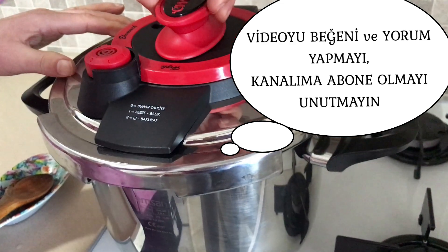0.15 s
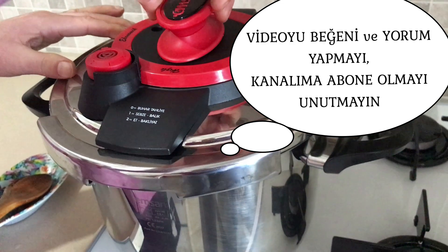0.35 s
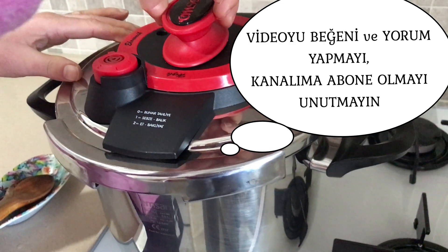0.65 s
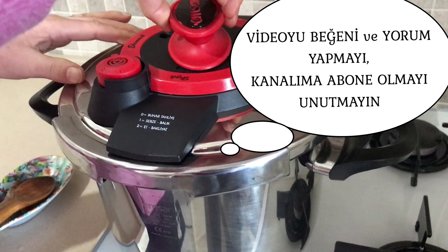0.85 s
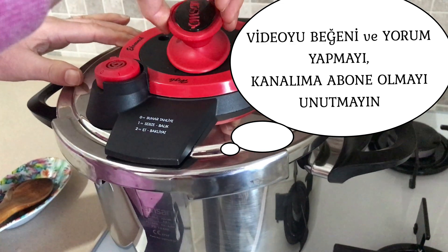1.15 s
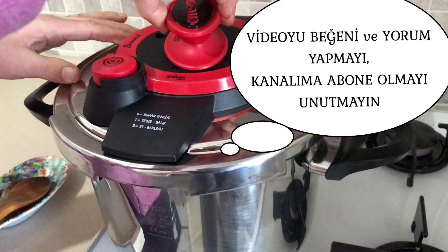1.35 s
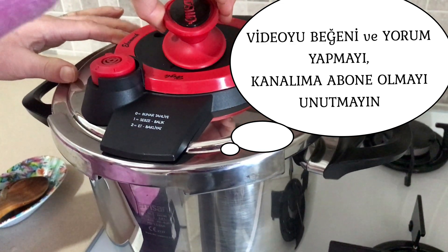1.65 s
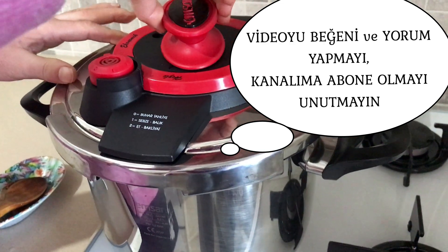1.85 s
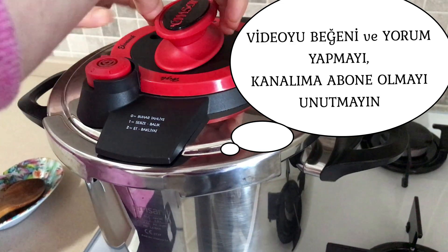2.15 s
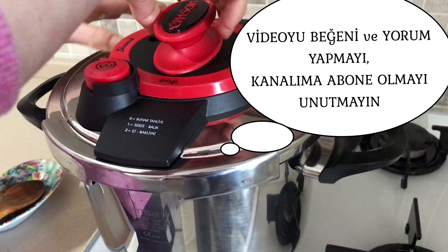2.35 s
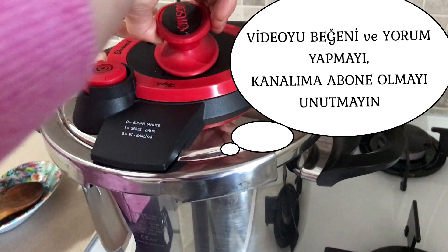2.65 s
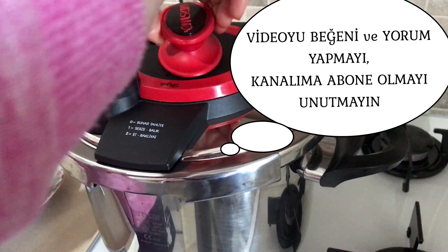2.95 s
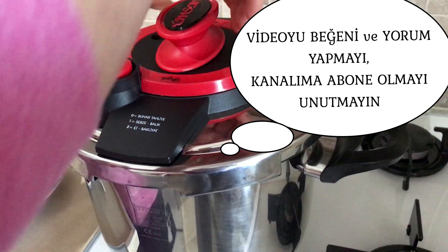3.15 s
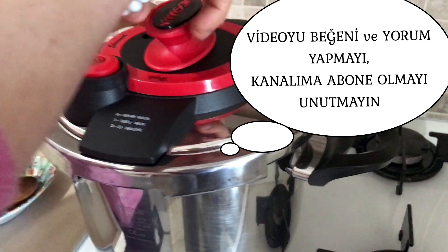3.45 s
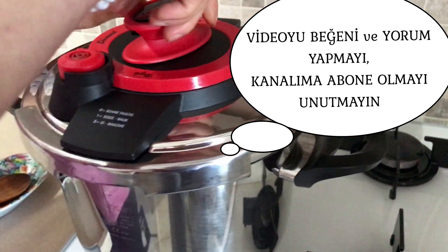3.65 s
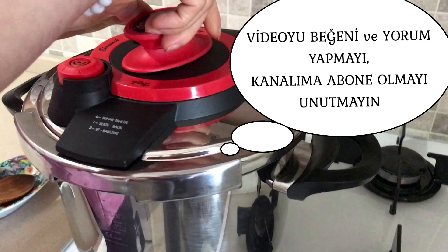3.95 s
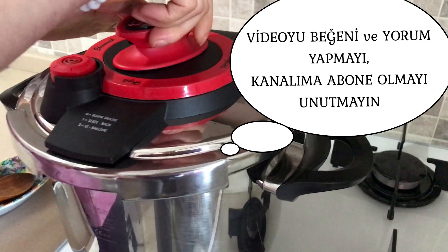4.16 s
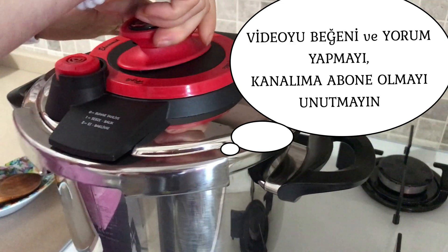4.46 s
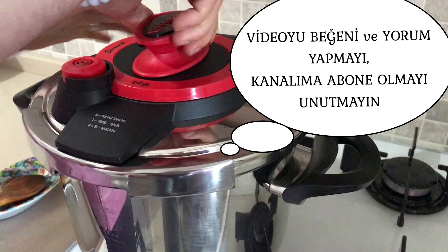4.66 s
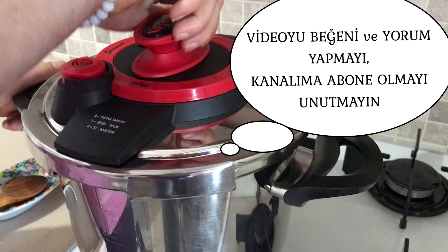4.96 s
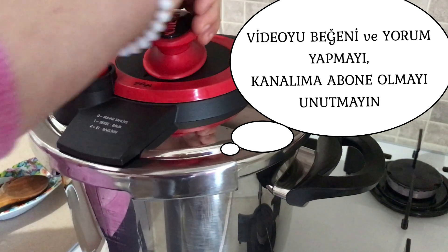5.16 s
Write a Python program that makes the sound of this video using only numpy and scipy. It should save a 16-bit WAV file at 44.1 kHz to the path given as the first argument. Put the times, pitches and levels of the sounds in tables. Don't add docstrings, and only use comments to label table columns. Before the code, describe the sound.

A plastic knob is worked on a steel pressure cooker lid, close to a camera microphone in a hard-walled kitchen. Faint taps begin around 0.1 s, with a clearer plastic clatter and tick at 0.34-0.44 s. At about 0.88 s the clamps snap home: several very fast, hard cracks, by far the loudest event, with bright steel ring, hollow pot boom and short echo. Firm smaller clicks follow at 1.16-1.27 s, then faint ticks. Around 2.0-2.1 s there are light clicks and a short rub; a sharper clack lands at 2.6 s. Soft rubbing and touches come near 3.1 s, a sudden scrape with ticks at 3.6-3.7 s, and low dull pot rocking to about 4.3 s. Clicks cluster at 4.56-4.63 s, and a crisp double knock with a soft rub closes near 5.2 s. Faint steady hiss with slight resonant colour and low rumble persist, briefly thinning at moments.

```python
import sys
import numpy as np
from scipy import signal
from scipy.fft import rfft, irfft, next_fast_len
from scipy.io import wavfile
from scipy.ndimage import map_coordinates

SR = 44100
rng = np.random.default_rng(int(sys.argv[2]) if len(sys.argv) > 2 else 0)


def master(y):
    cut = np.clip(np.atleast_2d(y).T, -1, 1)
    pcm = np.round(cut * 32767)
    wavfile.write(sys.argv[1], SR, pcm.astype(np.int16))


def field_ratio(decibels):
    return 10 ** (np.asarray(decibels, dtype=float) / 20)


N = 233834

# (time [s], peak level [dB], plastic pitch [Hz], rattle [ms])
KNOCKS = [(0.113, -53.5, 2300, 16), (.158, -41, 1280, 13), (0.337, -29.5, 1870, 23),
          (1.269, -31, 2090, 8.8), (2.0555, -40.5, 2230, 18), (2.072, -42, 2250, 8.3),
          (2.598, -29.5, 1960, 7), (2.6, -30.5, 3240, 5.4), (3.09, -47.5, 2190, 36),
          (4.5718, -29, 2560, 5.7), (5.1089, -45.5, 2155, 4.6), (5.1921, -22, 2440, 6.1),
          (5.1946, -25.5, 2430, 6.7), (5.201, -37, 2530, 5.9)]
# (time [s], peak level [dB], plastic pitch [Hz], rattle [ms])
TEETH = [
    (.251, -49.5, 2280, 9),
    (0.4356, -31, 1990, 19.4),
    (.85, -41, 1960, 6.3),
    (1.2241, -34.5, 1770, 15.7),
    (1.559, -50, 1950, 7.2),
    (1.7506, -55.5, 1350, 11),
    (2.0778, -37.5, 2070, 6.5),
    (2.872, -53, 1350, 8.5),
    (3.6101, -39.5, 1500, 6.5),
    (3.7185, -36.5, 2160, 6.2),
]
# (time [s], peak level [dB], plastic pitch [Hz], pot level [dB])
CLAMPS = [(.079, -56, 2330, -17), (0.3651, -44, 2250, -3), (.3822, -30, 2120, -14.5),
          (0.8754, -36, 1800, -7), (1.1579, -39, 1120, 0.5), (2.5203, -43, 2270, -12),
          (3.1144, -50, 2860, -6.5), (4.5583, -44, 870, 0), (4.6, -35, 1800, -5.5),
          (4.6339, -39.5, 1900, -4), (5.185, -47, 2980, -4)]
# (time [s], peak level [dB], plastic pitch [Hz], pot level [dB], rattle [ms])
BUMPS = [
    (0.3436, -31.5, 1410, -5, 25),
    (.911, -27, 2320, -5, 4.4),
    (2.4975, -50.5, 1840, -2.5, 7.9),
    (2.5597, -44, 2100, -2.5, 7.9),
    (3.514, -57.5, 1830, 3.5, 7),
    (3.859, -58.5, 1400, 11.5, 6.8),
    (4.108, -52.5, 780, -4, 8.3),
    (5.1205, -50, 1280, 1.5, 18),
]
# (time [s], peak level [dB], plastic pitch [Hz], steel level [dB], rattle [ms])
SNAP = [
    (0.8825, -23.5, 1570, 4.5, 3.5),
    (0.8847, -12, 2300, -3.5, 7.4),
    (.891, -8, 1780, -2.5, 12.4),
    (0.9006, -18, 2310, 0, 17),
    (0.903, -18, 3162, -5, 8.6),
]
# (start [s], peak time [s], peak level [dB], release t60 [s])
STROKES = [
    (1.998, 2.086, -52.5, 0.045),
    (2.505, 2.538, -57, .38),
    (3.044, 3.104, -54, 0.24),
    (3.612, 3.613, -43, 0.093),
    (3.642, 3.71, -53.5, 0.4),
    (5.102, 5.172, -51, 0.11),
]
# (time [s], level [dB], pitch [Hz], t60 [s])
ROCKS = [(.401, -47.5, 101.8, 0.7), (.459, -63, 135, 0.46), (.98, -41, 150, 0.17), (.915, -38, 548.4, 0.44),
         (.905, -36.5, 218.5, 0.46), (.97, -40, 92, 0.32), (1.181, -50.5, 215, 0.64),
         (1.26, -48, 223.7, 0.44), (1.204, -55, 96, 0.44), (1.379, -48, 61.5, 0.28),
         (1.549, -65.5, 310, 0.44), (2, -58, 98, 0.26), (2.558, -47.5, 361, 0.14), (2.87, -63, 317.4, 1),
         (3.121, -65, 92, .15), (3.52, -53.5, 353, 0.12), (3.532, -65, 218, 1), (3.666, -46.5, 117, 0.88),
         (3.68, -52.5, 214.8, 0.94), (3.798, -43.5, 239, 0.12), (3.84, -50.5, 146.6, 0.31),
         (3.858, -48, 214, 0.18), (3.879, -49.5, 96, .35), (4.16, -50, 225, 0.33), (4.16, -54.5, 143, 0.34),
         (4.299, -51, 217, 0.26), (4.609, -57, 136, .67), (4.682, -57, 102, 0.63), (5.192, -45, 150, 0.097)]

# (pitch [Hz], width [Hz], level [dB])
HOUSING = [(1350, 258, 4), (1726, 560, 3), (2440, 140, -1), (3200, 103, -20)]
# (pitch [Hz], level [dB], t60 [s])
STEEL_MODES = [(1825, -5, .3), (2290, -8, 0.43), (3108, -14, 0.22), (3200, 3.5, 0.05), (3370, -6, 0.15),
               (3484, -3, 0.21), (4620, -6.5, 0.055), (5650, -6.5, 0.035), (6100, -15, 0.1),
               (5740, -5.5, 0.16), (7500, 2.5, .1), (8870, 1, 0.097), (9500, -9, .08), (11400, -12.5, 0.13),
               (12500, -12.5, .12), (13430, -3.5, 0.064)]
# (pitch [Hz], level [dB], t60 [s])
POT_MODES = [(92, -2, 0.54), (117, -3.5, 0.43), (150, -3, 0.18), (218.3, -4, 0.27), (256.7, -15.5, 0.89),
             (271.6, -6, 0.19), (361, -6.5, 0.35), (420, -10.5, 0.063), (493.4, -8, 0.061),
             (544, -12, 0.56), (590, -6, 0.27), (742, -11.5, 0.063), (976, -13.5, 0.14)]
# (frequency [Hz], level [dB per Hz])
CRACK = [(1470, -31), (2500, -1), (6300, -8.5), (6710, -9), (7430, -7), (10400, -9), (12700, -3.5),
         (15900, -13), (16500, -28.5)]
# (frequency [Hz], level [dB per Hz])
TICK = [(1470, -23), (2500, 1), (3460, -7), (4270, -0.5), (5310, -9), (6110, -1), (6860, -4), (7530, -6),
        (16000, -12.5)]
# (frequency [Hz], t60 [s])
KITCHEN = [(150, 0.67), (1000, 0.65), (3000, 0.36), (7000, 0.32), (10000, 0.2), (15000, 0.17)]
# (frequency [Hz], level [dB per Hz])
RUB = [(300, -23.5), (600, -11.5), (1200, -12), (1800, -9.5), (2250, -5.5), (2700, -10.5), (4400, -17.5),
       (8000, -23), (15000, -25.5)]
# (frequency [Hz], level [dB per Hz])
HISS = [(150, 5), (300, 4.5), (700, 1), (2200, -9.5), (4000, -8), (8000, -12), (13000, -19), (15700, -5.5)]
# (pitch [Hz], width [Hz], level [dB])
HISS_BANDS = [(1006, 130, -1.5), (1400, 208, 1.5), (3430, 760, -6), (5136, 207, 1.5), (8870, 220, -8),
              (9670, 180, -7.5), (11830, 920, -7.5), (14290, 900, -11.5), (14520, 500, -7)]
# (frequency [Hz], level [dB per Hz])
RUMBLE = [(12, -40.5), (20, -28.5), (34, -8), (54, -2), (103, -11), (140, -25.5), (178, -29), (200, -28),
          (260, -62), (440, -120)]
THINNED = [.2347, .792, 2.2316, 2.7889, 3.0443, 3.2069, 4.0892, 4.2518, 4.3446, 4.5072, 4.809, 4.9019,
           5.0645]
DROPOUTS = [1.5118, 4.0196]


def unit(x):
    return x / np.sqrt(np.mean(x ** 2) + 1e-20)


def along(points, hz):
    f, v = np.transpose(points)
    return np.interp(np.log(hz + 1), np.log(f + 1), v)


def wobble(rate):
    knots = rng.standard_normal(int(N / SR) * rate + 2 * rate + 4)
    return map_coordinates(knots, [np.arange(N) * rate / SR])


def filtered(x, response):
    m = next_fast_len(len(x) + 8192)
    return irfft(rfft(x, m) * response(np.fft.rfftfreq(m, 1 / SR)), m)[:len(x)]


def resonance(f, hz, width_hz):
    return 1j * f * width_hz / (hz * hz - f * f + 1j * f * width_hz)


def noise(response, count=N):
    return unit(filtered(rng.standard_normal(count), response))


def ring(modes, t, spread_db, split):
    hz, db, t60 = np.transpose(modes)[:, :, None]
    detune, phase, strength = rng.standard_normal((3, len(modes), 1))
    first = np.sin(2 * np.pi * hz * t)
    second = np.sin(2 * np.pi * hz * (1 + split * detune) * t + 2 * phase)
    decay = field_ratio(db + spread_db * strength - 60 * t / t60)
    return np.sum(decay * (first + 0.72 * second), axis=0)


def contacts():
    knocks = [(s, db, hz, -48 - 0.58 * db, -33.5 - 0.356 * db, ms) for s, db, hz, ms in KNOCKS]
    teeth = [(s, db, hz, -9.5, -12, ms) for s, db, hz, ms in TEETH]
    clamps = [(s, db, hz, -2.1, pot_db, 12) for s, db, hz, pot_db in CLAMPS]
    bumps = [(s, db, hz, -16.5, pot_db, ms) for s, db, hz, pot_db, ms in BUMPS]
    snap = [(s, db, hz, steel_db, -10 - 440 * (s - SNAP[0][0]), ms) for s, db, hz, steel_db, ms in SNAP]
    return sorted(knocks + teeth + clamps + bumps + snap)


def housing(f):
    return sum((-1) ** k * field_ratio(db) * resonance(f, hz, w) for k, (hz, w, db) in enumerate(HOUSING))


def plastic_knock(rattle, hz, rattle_ms):
    blow = rattle * rng.standard_normal(len(rattle))
    blow[8] += 400 / rattle_ms ** 2

    def body(f):
        pitch = resonance(f, hz, 0.17 * hz)
        shell = housing(f) * 2.5 / rattle_ms ** 0.85
        dull = 0.13 * resonance(f, 0.37 * hz, 2.7 * hz)
        return (pitch + shell + dull) / (1 + 1j * f / 3500) ** 2

    knob = filtered(blow, body)
    return knob / np.abs(knob).max()


def housing_buzz(t):
    return field_ratio(-25.0 - 60 * t / .3) * (1 - np.exp(-t / .004)) * noise(housing, count=len(t))


def steel_crack(rattle, t, db):
    spectrum = CRACK if db > -22 else TICK
    crack = rattle * noise(lambda f: field_ratio(along(spectrum, f)), count=len(t))
    return crack + field_ratio(-21.5) * ring(STEEL_MODES, t, spread_db=5.5, split=0.014)


def pot_boom(t):
    thud = 0.97 * field_ratio(-60 * t / 0.18) * noise(lambda f: resonance(f, 300, 440), count=len(t))
    modes = ring(POT_MODES, t, spread_db=2.0, split=.04)
    return modes * field_ratio(2.7 * wobble(40)[:len(t)]) * (1 - np.exp(-t / 0.00061)) + thud


def room_tail(count):
    hz, t, z = signal.stft(rng.standard_normal(count), SR, nperseg=256)
    decay = field_ratio(-60 * t / along(KITCHEN, hz)[:, None])
    tail = signal.istft(z * decay, SR, nperseg=256)[1][:count]
    return tail / np.linalg.norm(tail)


def clicks():
    out, span = np.zeros(N + SR), SR // 2
    t = np.arange(span) / SR
    for s, db, hz, steel_db, pot_db, rattle_ms in contacts():
        rattle = np.exp(-(t / (rattle_ms / 1600)) ** 2) * (1 - np.exp(-t / 0.0001))
        knob = plastic_knock(rattle, hz, rattle_ms)
        near = knob + field_ratio(steel_db - 2.5) * steel_crack(rattle, t, db)
        delayed = np.pad(near[:span // 4], (260, 0))
        echo = signal.fftconvolve(delayed, room_tail(span))[:span]
        contact = near + housing_buzz(t) + field_ratio(-12) * echo + field_ratio(pot_db - 6) * pot_boom(t)
        out[round(s * SR):][:span] += field_ratio(db) * contact
    return out[:N]


def grip_rocking():
    out, t = np.zeros(N + SR), np.arange(SR) / SR
    for s, db, hz, t60 in ROCKS:
        rise_s = .011 + 2.2 / hz
        swell = np.sin(np.pi / 2 * np.clip(t / rise_s, 0, 1)) ** 2
        swell = swell * field_ratio(-60 * np.clip(t - rise_s, 0, 1) / t60)
        drift = np.cumsum(1 + 0.032 * wobble(25)[:SR]) / SR
        level = field_ratio(db + 1.0 + 1.5 * wobble(30)[:SR])
        out[round(s * SR):][:SR] += level * swell * np.sin(2 * np.pi * hz * drift)
    return out[:N]


def knob_rub():
    t, stroke = np.arange(N) / SR, np.zeros(N)
    for start, peak, db, t60 in STROKES:
        stroke += field_ratio(np.interp(t, [start - .01, start, peak, peak + t60], [-110, db - 6.5, db, db - 60]))
    grains = field_ratio(1.0 * wobble(300))
    rub = filtered(grains * rng.standard_normal(N), lambda f: field_ratio(along(RUB, f)))
    return field_ratio(-4.5) * stroke * unit(rub)


def background():
    broad = field_ratio(-62.0 + 0.67 * wobble(8)) * noise(lambda f: field_ratio(along(HISS, f)) * (f > 120))

    def tops(f):
        return sum(field_ratio(db) * resonance(f, hz, w) ** 2 for hz, w, db in HISS_BANDS)

    bands = field_ratio(-61.5 + 0.21 * wobble(5)) * noise(tops)
    rumble = field_ratio(-56.5 + 0.41 * wobble(3)) * noise(lambda f: field_ratio(along(RUMBLE, f)))
    since = np.arange(N) / SR - .885
    duck_db = -5 * np.exp(-np.abs(since) / 0.091) * (since > 0)
    return field_ratio(duck_db) * (broad + bands + rumble)


def scene():
    return (clicks() + grip_rocking() + knob_rub() + background())[None]


def thinned_blocks(hop_s):
    single = [(s, .04, .84) for s in THINNED]
    runs = [(s + k * hop_s, .04, .95 if k else 1) for s in DROPOUTS for k in (-1, 0, 1)]
    snap_tail = [(.9545, .15, .84)]
    return sorted(single + runs + snap_tail)


def thin_out(x):
    size = 2048
    window, out = np.sin(np.pi * (np.arange(size) + .5) / size), x.copy()
    for s, share, removed in thinned_blocks(size / 2 / SR):
        block = slice(round(s * SR) - size // 2, round(s * SR) + size // 2)
        lines = rfft(window * x[block])
        heard = np.abs(lines) * np.arange(1, len(lines) + 1) ** 0.17
        weak = heard < np.quantile(heard, 1 - share)
        out[block] -= removed * window * irfft(lines * weak, size)
    return out


def roll_off(x):
    return signal.sosfilt(signal.butter(12, 16810, fs=SR, output="sos"), x)


def record(dry):
    x = filtered(dry[0], lambda f: (f < 15830) * (1j * f / (1j * f + 32)) ** 4)
    mix = thin_out(x)[None]
    return roll_off(mix)


dry = scene()
out = record(dry)
master(out)
```